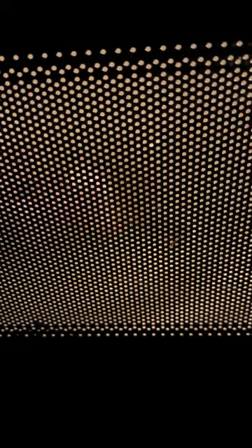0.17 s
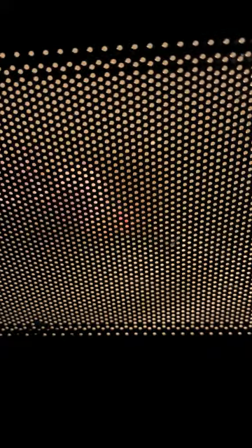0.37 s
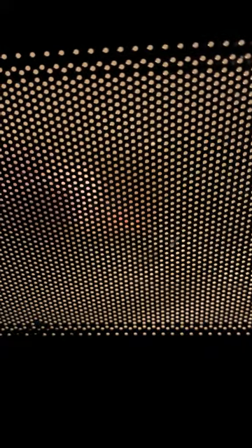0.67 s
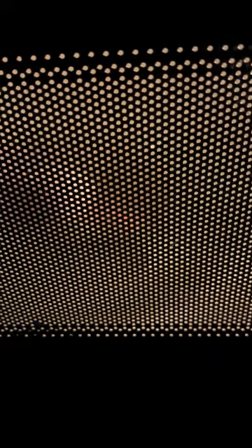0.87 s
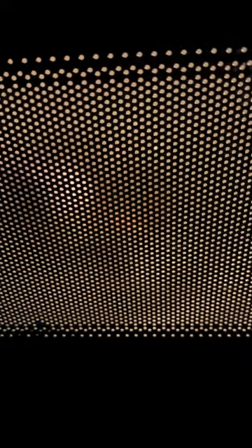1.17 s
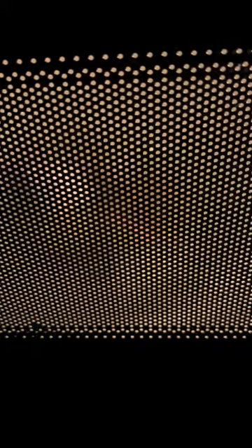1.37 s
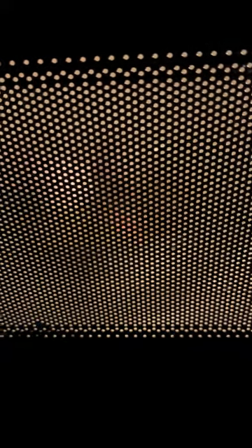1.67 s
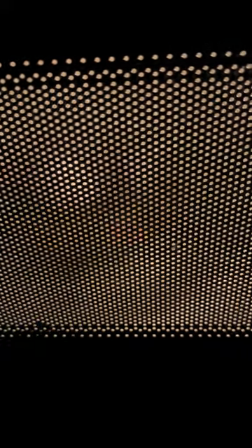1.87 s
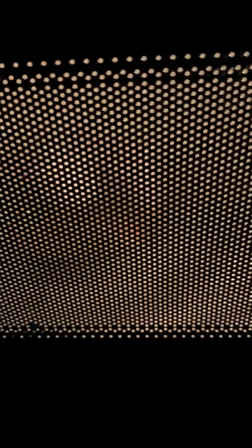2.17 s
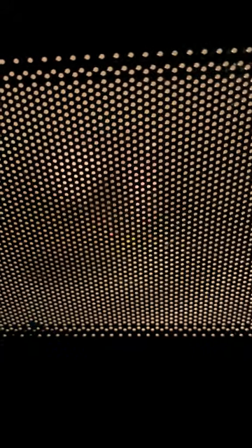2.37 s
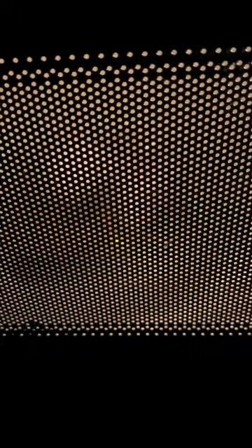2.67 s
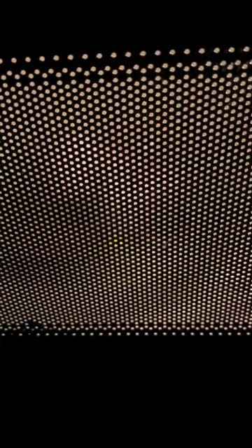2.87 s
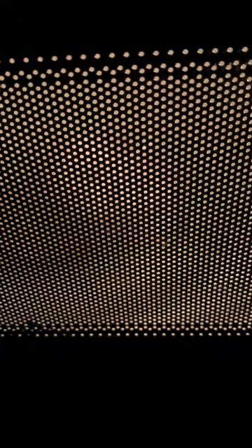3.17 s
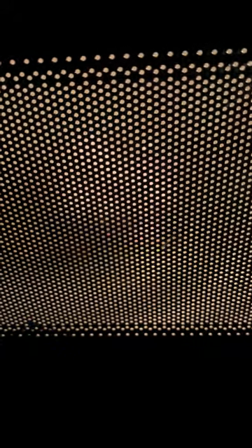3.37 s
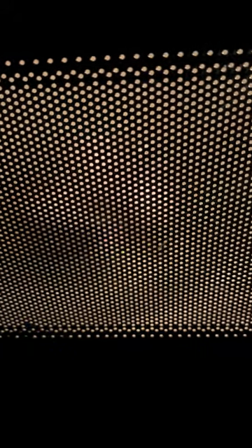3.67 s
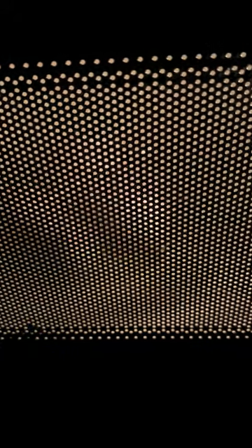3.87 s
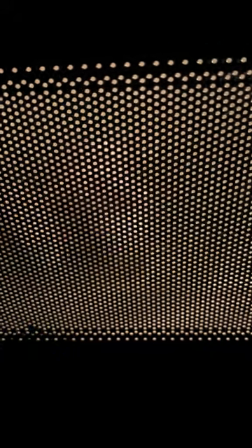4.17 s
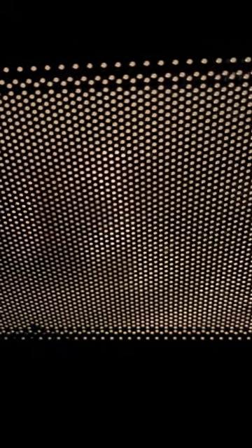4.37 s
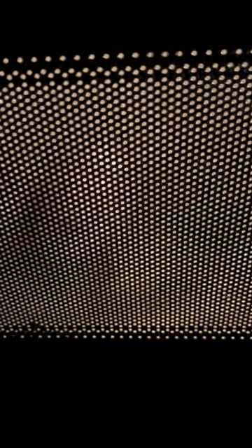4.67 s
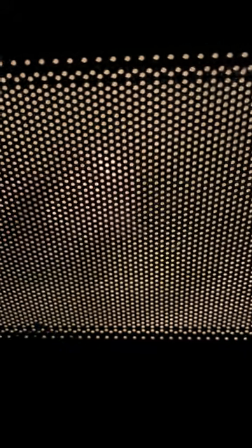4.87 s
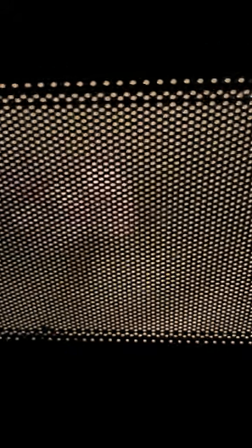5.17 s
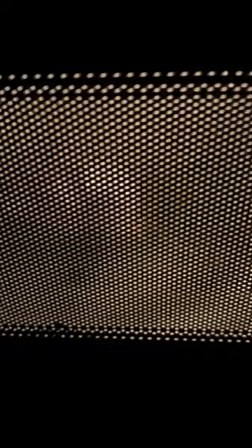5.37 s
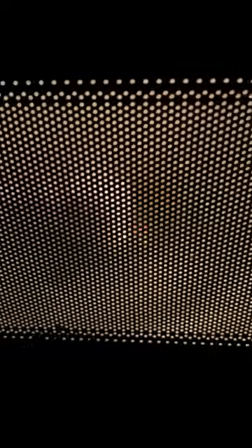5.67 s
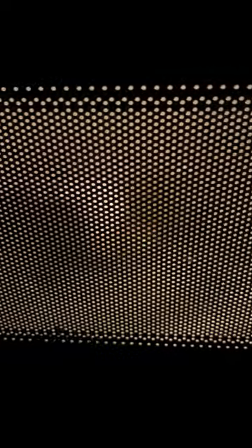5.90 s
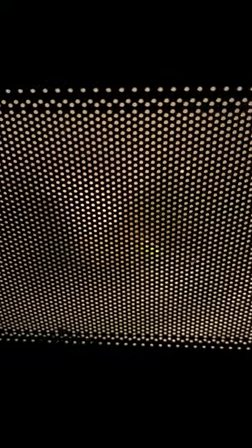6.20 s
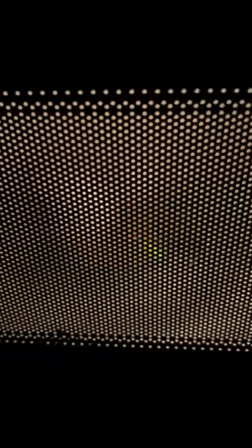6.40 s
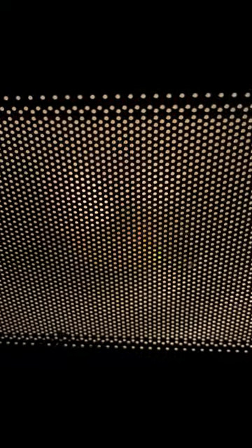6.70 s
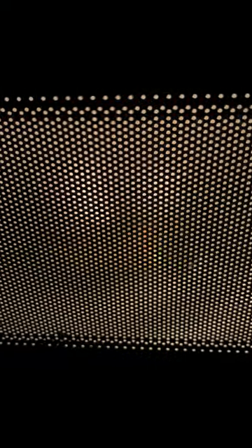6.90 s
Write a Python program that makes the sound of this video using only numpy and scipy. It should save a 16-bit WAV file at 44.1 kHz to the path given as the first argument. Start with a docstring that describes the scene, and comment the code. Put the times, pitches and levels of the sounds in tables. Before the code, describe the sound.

Close to a running microwave: deep mains hum swelling slightly, steady fan and air, irregular crisp food pops, faint sizzle and tiny dry ticks.

```python
"""In a kitchen, a microwave oven runs, heard from a phone held close to its door.
The transformer hums on multiples of the mains and grows as it warms; a fan drones, both built from sine waves.
Moving air is shaped noise. Food on the turntable spits and pops as noise bursts that ring in the metal cavity,
with trickling sizzle and soft rustles of grainy noise; the plate ticks in short, dry noise bursts."""
import sys
import numpy as np
from scipy import signal
from scipy.fft import rfft, irfft
from scipy.io import wavfile
from scipy.ndimage import uniform_filter1d

SR = 44100
rng = np.random.default_rng(int(sys.argv[2]) if len(sys.argv) > 2 else 0)


def linear_from_db(decibels):
    """Turn decibels (scalar or array-like) into linear amplitude factors; 0 gives 1."""
    return 10 ** (np.asarray(decibels, float) / 20)


def generate_wav(signal):
    """Clip the signal to [-1, 1] and save it as 16-bit WAV at the path in sys.argv[1]."""
    frames = np.transpose(np.atleast_2d(signal))
    scaled = np.clip(frames, -1, 1) * 32767
    pcm = np.round(scaled).astype(np.int16)
    wavfile.write(sys.argv[1], SR, pcm)


N = 310464
T = np.arange(N) / SR
MAINS_HZ = 59.975


def walk(rate):
    """Random levels held for 1 / rate seconds and smoothed twice; spread near 1."""
    hold = int(SR / rate)
    steps = np.repeat(rng.standard_normal(N // hold + 1), hold)
    smooth = uniform_filter1d(uniform_filter1d(steps, hold), hold)
    return 1.43 * smooth[:N]


def band(x, lo_hz, hi_hz):
    """Steep band-pass: keeps only the pitches between two limits."""
    return signal.sosfilt(signal.butter(3, [lo_hz, hi_hz], "bandpass", fs=SR, output="sos"), x)


def shape(table, hz):
    """Gain read from a table of pitch and dB, on a log-frequency axis."""
    f, db = np.transpose(table)
    return linear_from_db(np.interp(np.log(hz + 1), np.log(f), db))


def peaks(table, hz):
    """Gain of resonances: each is a bump or dip with a centre, a width and a height in dB."""
    return linear_from_db(sum(db / (1 + (2 * (hz - peak_hz) / width) ** 2) for peak_hz, width, db in table))


# How the two microphone ports differ. Each row: pitch in Hz, likeness from 0 to 1,
# left minus right in dB, phase by which the right leads in radians (negative: it lags).
PORTS = [(0, 1.0, .1, 0.0), (150, .995, .4, .1), (300, .97, .9, .2), (480, .86, .6, .25),
         (680, .4, -.3, .6), (950, .55, -.9, -.3), (1500, .78, -.9, 0.0), (1950, .75, -.9, -.45),
         (2400, .5, -.8, -2.1), (3500, .6, .2, -1.7), (4300, .93, .2, -2.7), (4700, .995, .2, -3.14),
         (17000, .95, 0.0, -21.3)]


def ports(near, other, least=0):
    """Both ports hear a shared sound, shifted in phase between them, plus a share of opposite sign."""
    hz = np.fft.rfftfreq(N, 1 / SR)
    f, *columns = np.transpose(PORTS)
    like, pan_db, lead = (np.interp(hz, f, c) for c in columns)
    like = np.clip(like, least, 1)
    mid = np.sqrt((1 + like) / 2) * rfft(near)
    side = np.sqrt((1 - like) / 2) * rfft(other)
    left = (mid + side) * linear_from_db(pan_db / 2)
    right = (mid - side) * linear_from_db(-pan_db / 2) * np.exp(1j * lead)
    return irfft([left, right], N)


def port_lead(hz):
    """Radians by which the left port leads at a pitch."""
    f, *_, lead = np.transpose(PORTS)
    return -np.interp(hz, f, lead)


def tone(phase, db, pan_db, lead, waver_db):
    """One sine partial, its rms level in dB, that wavers slowly and flutters fast."""
    side = np.array([[.5], [-.5]])  # left, right
    start = rng.uniform(0, 2 * np.pi) + 0.11 * waver_db * walk(25)
    waver = waver_db * (walk(2.976) + 1.1 * walk(25))
    level = np.sqrt(2) * linear_from_db(db + waver + side * pan_db)
    return level * np.sin(phase + start + side * lead)


# How loud the drone on the third mains multiple is as it warms. Each row: time in seconds, level in dB.
WARMING = [(0, -60), (.35, -45.5), (.75, -40), (1.5, -35.5), (2.2, -36.5), (3.4, -32.5), (4.1, -34),
           (5.9, -31.8), (6.5, -30.5), (7.04, -31)]
# Other strong hum partials. Each row: mains multiple, level in dB when the drone is at SETTLED_DB,
# share of the drone's change in dB after the first second (negative: the opposite way),
# left minus right in dB, phase by which the left leads in radians.
PARTIALS = [(2, -38, .8, 0.44, .02), (6, -46, -.2, 1.7, -0.3), (8, -49.5, -.2, 1, .1)]
SETTLED_DB = -33
HUM_DRIFT_DB, HUM_DRIFT_PER_S = 1, 2.493


def transformer_hum():
    """The core flexes with the mains field: a drone that grows as it warms, and strong partials."""
    phase = 2 * np.pi * MAINS_HZ * T
    warm_db = np.interp(T, *np.transpose(WARMING))
    # never below the level reached at one second
    late_db = np.maximum(warm_db, warm_db[SR]) - SETTLED_DB
    hum = tone(3 * phase, warm_db, .5, -.16, .2)
    for k, db, share, pan_db, lead in PARTIALS:
        level_db = db + share * late_db + HUM_DRIFT_DB * walk(HUM_DRIFT_PER_S)
        hum += tone(round(k) * phase, level_db, pan_db, lead, .2)
    return hum


# Weak buzz partials. Each row: mains multiple, level in dB, left minus right in dB.
BUZZ = [(1, -54.1, .1), (4, -51, .9), (7, -60.1, 3.6), (11, -69.3, -.7), (12, -73.9, -3.1),
        (14, -62.9, 1.4), (15, -66.8, -3.2), (16, -65.4, -4.5), (17, -74.5, -4.2), (20, -68.2, -.6),
        (21, -72.2, -1.7), (23, -67.3, -2.2), (25, -71.6, 1.4), (27, -71.2, -1.5), (28, -67.5, 0),
        (29, -71.8, -2.7), (30, -69.2, -.7)]
RATTLE_MULTIPLES = range(31, 64)
RATTLE_DB, RATTLE_DB_PER_MULTIPLE, RATTLE_SCATTER_DB = -85, -0.0912, 4.5


def transformer_buzz():
    """Higher mains multiples from the same core: a faint buzz, with a randomly uneven rattle above it."""
    phase = 2 * np.pi * MAINS_HZ * T
    rattle = []
    for k in RATTLE_MULTIPLES:
        level_scatter, pan_scatter = rng.uniform(-1, 1, 2)
        db = RATTLE_DB + RATTLE_DB_PER_MULTIPLE * (k - 31) + RATTLE_SCATTER_DB * level_scatter
        rattle.append((k, db, 3.4 * pan_scatter))
    return sum(tone(k * phase, db, pan_db, port_lead(k * MAINS_HZ), 1.5)
               for k, db, pan_db in [*BUZZ, *rattle])


# Fan speed before a small random drift. Each row: time in seconds, base pitch in Hz.
FAN = [(0, 72.98), (.6, 72.78), (1.5, 72.76), (2.5, 72.63), (3.3, 72.66), (4.9, 72.91), (5.55, 72.79),
       (6.1, 73.06), (7.04, 72.82)]
# Weak fan partials. Each row: multiple of the base pitch, level in dB, left minus right in dB,
# phase by which the left leads in radians.
FAN_UPPER = [(5, -62, .6, -.3), (6, -63, -.1, -.2), (8, -65, 1.1, -.5), (9, -60.3, -4.1, -1.1)]
FAN_SECOND_DB, FAN_FOURTH_DB, FAN_DRIFT_DB = -41.5, -43.5, 1.8


def fan():
    """Multiples of one turning speed make the drone; the speed drifts a little, so they bend together."""
    speed_hz = np.interp(T, *np.transpose(FAN)) * (1 + 0.0011 * walk(4))
    phase = 2 * np.pi * np.cumsum(speed_hz) / SR
    drone = tone(2 * phase, FAN_SECOND_DB + FAN_DRIFT_DB * walk(1.5), -.3, -.1, 1.2)
    drone += tone(4 * phase, FAN_FOURTH_DB + FAN_DRIFT_DB * walk(1.5), .9, -.4, 1.0)
    for k, db, pan_db, lead in FAN_UPPER:
        drone += tone(round(k) * phase, db, pan_db, lead, 1.5)
    return drone


# Moving air and cabinet rumble, before the resonances. Each row: pitch in Hz, level in dB per Hz.
AIR = [(25, -82), (42, -69.5), (70, -58), (105, -60.5), (165, -59.5), (200, -70.5), (300, -67), (400, -71),
       (480, -71), (620, -78.5), (1000, -79.5), (1600, -80.5), (2300, -93), (3300, -99), (3900, -103),
       (4800, -104), (5600, -115), (9000, -121.5), (16000, -127)]
# Resonances of ducts and panels. Each row: pitch in Hz, width in Hz, height in dB (negative: a dip).
DUCTS = [(220, 12, 3), (305, 20, 2.5), (330, 20, -2.5), (775, 20, 4), (880, 150, 1.5), (1335, 60, 2.5),
         (1420, 60, -3.5), (1950, 200, 1.5), (3550, 250, 3), (3950, 250, -3.5), (4600, 400, 2),
         (6400, 500, -2), (7600, 600, -2), (8200, 200, 2), (10850, 50, 7), (11150, 50, 6)]
FLICKER_DB, GUST_DB, THROB_DB_PER_OCTAVE = 1.23, .4, 0.1031


def air():
    """Smooth rush of noise; each octave flickers by itself, the upper ones throb at twice the mains rate."""
    hz = np.fft.rfftfreq(N, 1 / SR)
    noise = rfft(rng.standard_normal((2, N))) * np.sqrt(SR / 2)
    spectrum = noise * shape(AIR, hz) * peaks(DUCTS, hz)
    octave = np.clip(np.log2(hz / 40 + 1e-9), 0, 8)
    gust = walk(4)
    throb = np.sin(2 * np.pi * 2 * MAINS_HZ * T)
    rush = np.zeros((2, N))
    for k in range(9):
        # neighbouring octaves overlap as triangles
        part = irfft(spectrum * np.clip(1 - abs(octave - k), 0, 1), N)
        rush += part * linear_from_db(FLICKER_DB * walk(7) + GUST_DB * gust + THROB_DB_PER_OCTAVE * k * throb)
    return ports(*rush)


# Ring of the metal cavity, in four bands. Each row: from Hz, to Hz, time to fade by 60 dB in seconds.
CAVITY = [(2000, 5000, .14), (5000, 8500, .13), (8500, 12000, .12), (12000, 15800, .11)]
# Pops, before snap and colour. Each row: start in seconds, level in dB per 10 kHz in the third band,
# knock in dB added in the lowest band, wetness in dB added in the second band (it also dulls the top one),
# length of the spit in seconds before the ring fades.
POPS = [(0.038, -58.5, 7, 2, .01), (0.051, -53.5, 13.5, 5, 0.0097), (.1331, -69.5, 4, -1, .004),
        (.4668, -75, -1, 0, .02), (.4848, -64, 2, 0, .004), (.7672, -81, 0, 3, .02),
        (0.9176, -49, 0, -1, 0.0088), (1.0335, -62, 2, -2, .04), (1.051, -43.5, -1, 2, .02),
        (1.136, -60, -3, 0, .004), (1.3503, -50.5, -1, 0, .014), (1.6028, -67, 18.5, 15, 0.013),
        (2.4688, -72, -3, -3, .001), (2.6179, -68, 5, -5, 0.0045), (3.051, -61.5, 7, -4, .004),
        (3.266, -69, 6, -2, .004), (3.7184, -63, 2, 0, .06), (3.7519, -66, -5, -2, .001),
        (3.77, -66, -4, -2, .01), (3.785, -58.5, 6, -2, 0.025), (4.1016, -62, 6, 2, .014),
        (4.5017, -53, 13, 8.5, .008), (4.6189, -43.5, -2.5, 1, 0.0046), (4.869, -71.5, 9, 8, .03),
        (5.0355, -51.5, 3, 1.5, 0.013), (5.253, -73, 14, 16, .008), (5.3023, -68.5, -2, 1, .004),
        (5.485, -44, -0.5, 1.5, 0.012), (6.02, -64.5, 5.5, 2, .004), (6.0862, -48, 0.5, 2.5, .008),
        (6.101, -42, -1.5, 1, 0.0074)]
SNAP_DB, SNAP_S = 5, .002
TOP_DB, TOP_LOSS_PER_WET_DB = -2, 0.6


def pops(size=12000):
    """Each pop snaps, spits steam for a moment and rings on in the cavity, treble dying first."""
    t = T[:size]
    out = np.zeros((2, N + size))
    for s, db, knock_db, wet_db, spit_s in POPS:
        noise = rng.standard_normal((2, size)) * np.sqrt(SR / 2 / 1e4)
        # every spot on the plate excites its own set of cavity resonances
        bumps = np.interp(np.arange(size // 2 + 1), np.arange(80) * size / 158, rng.standard_normal(80))
        noise = irfft(rfft(noise) * linear_from_db(3.5 * bumps - .7), size)
        grains = np.repeat(rng.standard_normal(size // 40), 40)
        spit_db = 3.2 * grains * np.exp(-t / .025)
        snap_db = SNAP_DB * np.exp(-t / SNAP_S)
        noise = noise * linear_from_db(db + spit_db + snap_db)
        band_db = (knock_db, wet_db, 0, TOP_DB - TOP_LOSS_PER_WET_DB * wet_db)
        i = int(s * SR)
        for (lo, hi, t60), rel_db in zip(CAVITY, band_db):
            fade = np.exp(-np.log(1000) * (t - spit_s).clip(0) / t60)
            out[:, i:i + size] += linear_from_db(rel_db) * band(noise * fade, lo, hi)
    return out[:, :N]


# Bursts of sizzle, before colour. Each row: peak in seconds, level in dB, fade in seconds.
SIZZLE = [(0, -89, .3), (3.95, -71, .09), (4.2, -80.5, .7), (5.1, -84, .3), (5.7, -81, .04),
          (6.83, -85.5, .8)]
SIZZLE_FLOOR_DB, SIZZLE_RISE_S = -91.5, .06


def sizzle():
    """Hiss that trickles unevenly at a low floor and rises in bursts."""
    hiss = band(rng.standard_normal((2, N)), 3500, 15800)
    bursts = sum(linear_from_db(db) * np.exp(np.minimum((T - s) / SIZZLE_RISE_S, (s - T) / fade_s))
                 for s, db, fade_s in SIZZLE)
    trickle = linear_from_db(1.2 * walk(34))
    return (linear_from_db(SIZZLE_FLOOR_DB) + bursts) * trickle * hiss / hiss.std()


# Colour that cavity and door give to pops and sizzle. Each row: pitch in Hz, width in Hz,
# height in dB (negative: a dip).
DOOR = [(2500, 900, -4), (4700, 500, 1), (5500, 400, -3), (6400, 300, 3), (7250, 250, -4), (7800, 250, 2),
        (8300, 700, -3), (9700, 500, -3), (10400, 250, 5), (10900, 500, -3), (14700, 500, -3),
        (15400, 600, 3)]


def food():
    """Pops and sizzle pass through the resonances of cavity and door."""
    colour = peaks(DOOR, np.fft.rfftfreq(N, 1 / SR))
    heard = irfft(rfft(pops() + sizzle()) * colour, N)
    return ports(*heard, least=0.98)


# Small dry ticks of the plate. Each row: start in seconds, starting level in dB, from Hz, to Hz,
# time to fade by 60 dB in seconds.
TICKS = [(2.4835, -44, 2300, 3400, .03), (3.7185, -59, 1800, 14000, .025), (3.739, -57, 1800, 9000, .03),
         (3.7525, -47, 1800, 16000, .025), (3.7765, -53, 1800, 7000, .025), (5.453, -55, 3000, 4700, .06),
         (6.150, -49, 2500, 2850, .05), (6.801, -56, 2000, 3000, .06), (6.801, -76, 5950, 6450, .25)]


def plate(size=8000):
    """Dry ticks: short bursts of noise that get no cavity ring."""
    out = np.zeros(N + size)
    for s, db, lo, hi, t60 in TICKS:
        noise = band(rng.standard_normal(size), lo, hi)
        fade = np.exp(-np.log(1000) * T[:size] / t60)
        i = int(s * SR)
        out[i:i + size] += linear_from_db(db) * noise / noise.std() * fade
    return ports(out[:N], 0 * T, least=1.0)


# Soft rustles of the food settling. Each row: start in seconds, length in seconds, level in dB.
RUSTLES = [(3.7, .32, -68), (5.58, .14, -64), (6.8, .24, -63.5)]


def rustle():
    """Grainy noise that swells and fades as the food settles."""
    swell = sum(linear_from_db(db) * np.sin(np.pi * np.clip((T - s) / length_s, 0, 1)) ** .5
                for s, length_s, db in RUSTLES)
    noise = band(rng.standard_normal((2, N)), 2900, 4600)
    grain = linear_from_db(3.0 * walk(60))
    return ports(*(swell * grain * noise / noise.std()))


def scene():
    """Everything added together at the two ports."""
    return transformer_hum() + transformer_buzz() + fan() + air() + food() + plate() + rustle()


def top_cut(x):
    """Nothing passes above the cut-off."""
    return signal.sosfilt(signal.butter(12, 16710, fs=SR, output="sos"), x)


def record(dry):
    """The phone cuts the top with a steep low-pass at 15750 Hz."""
    low_pass = signal.ellip(8, .2, 30, 15750, fs=SR, output="sos")
    mix = signal.sosfilt(low_pass, dry)
    return top_cut(mix)


dry = scene()
out = record(dry)
generate_wav(out)
```